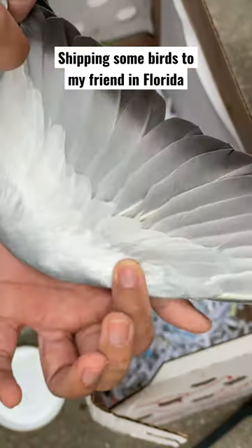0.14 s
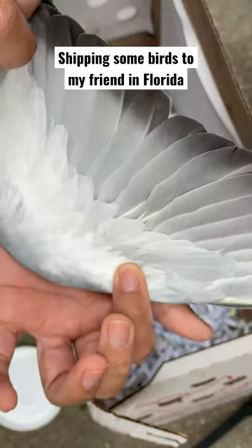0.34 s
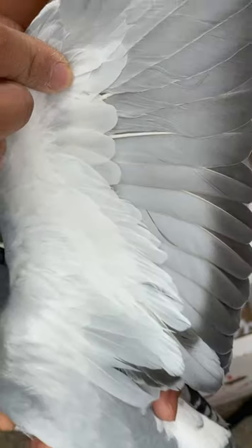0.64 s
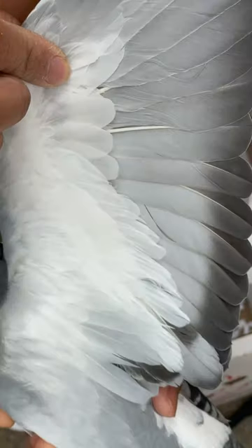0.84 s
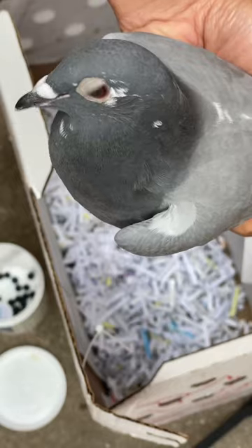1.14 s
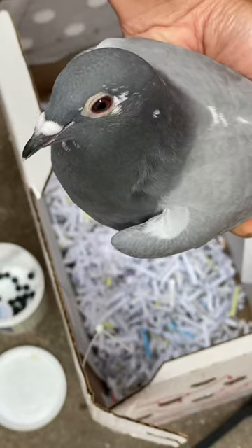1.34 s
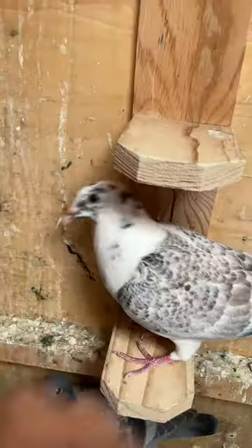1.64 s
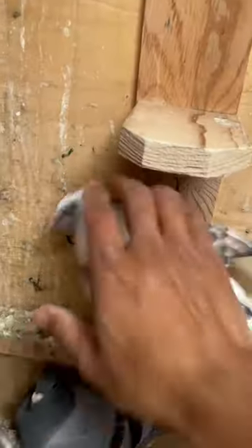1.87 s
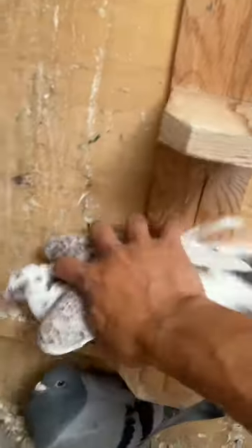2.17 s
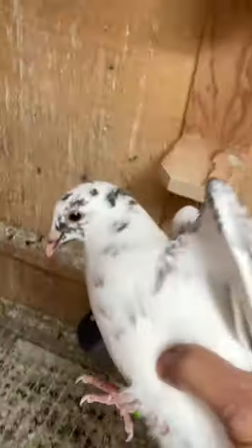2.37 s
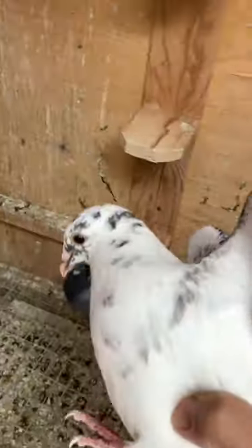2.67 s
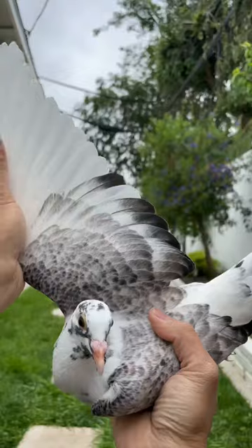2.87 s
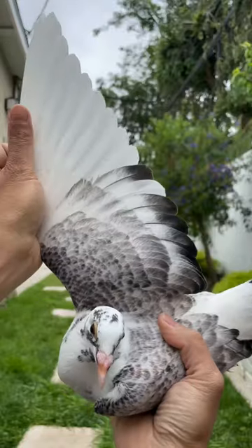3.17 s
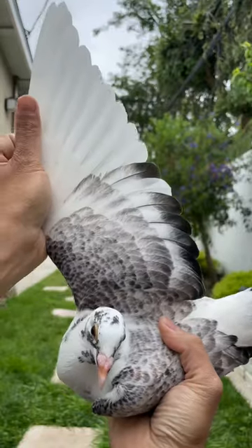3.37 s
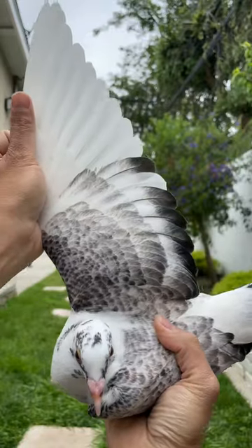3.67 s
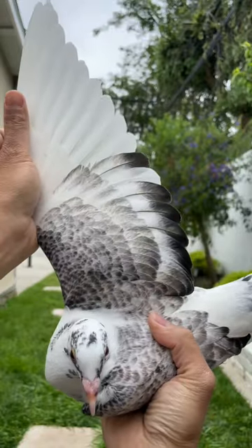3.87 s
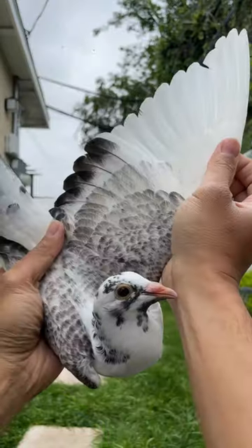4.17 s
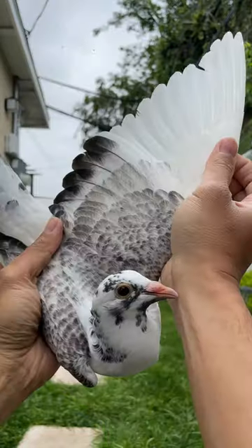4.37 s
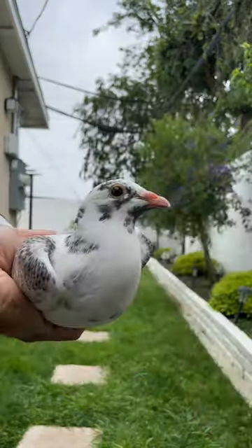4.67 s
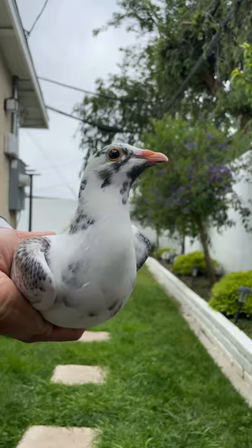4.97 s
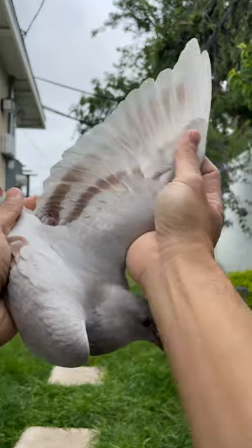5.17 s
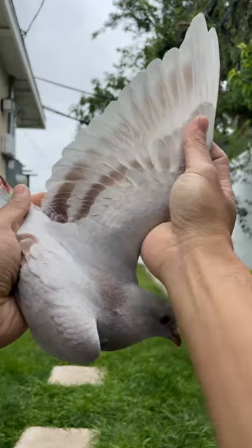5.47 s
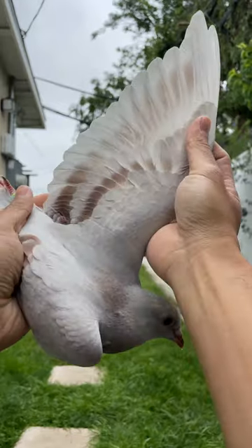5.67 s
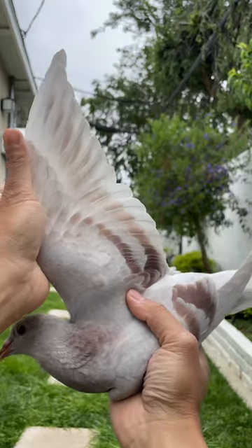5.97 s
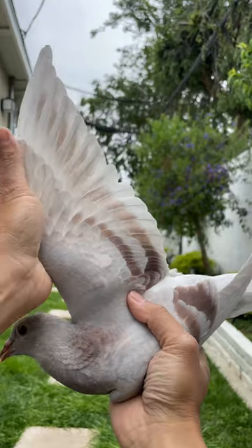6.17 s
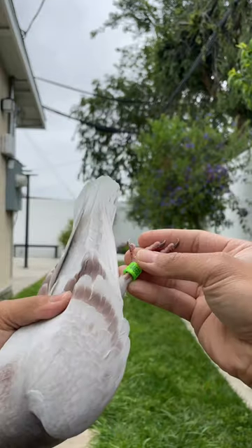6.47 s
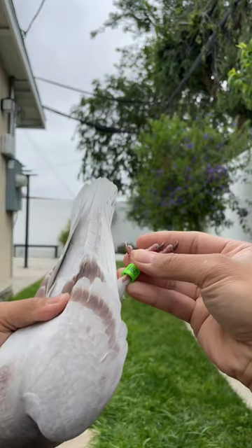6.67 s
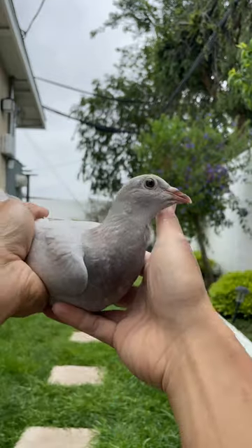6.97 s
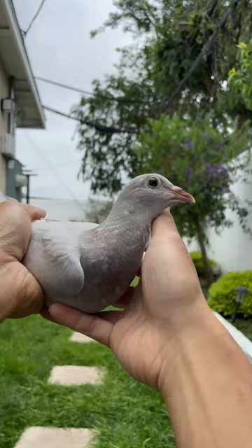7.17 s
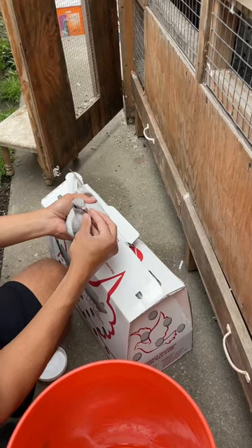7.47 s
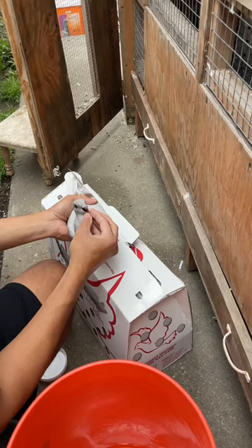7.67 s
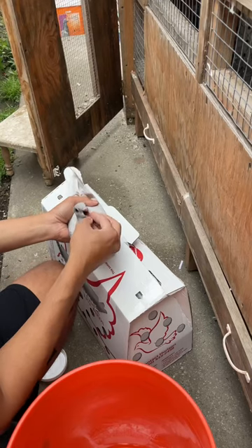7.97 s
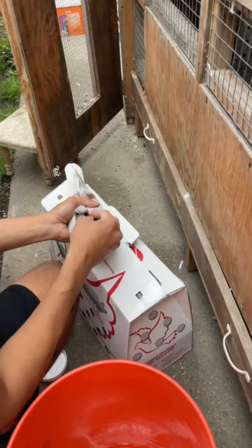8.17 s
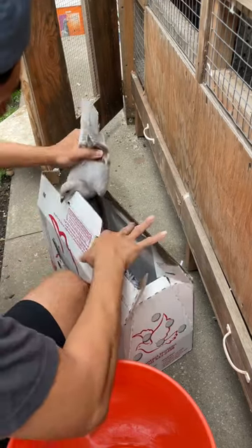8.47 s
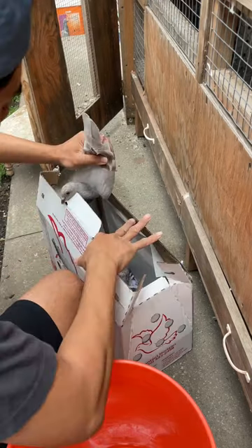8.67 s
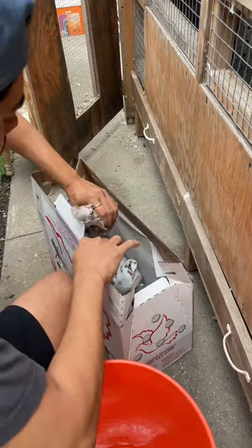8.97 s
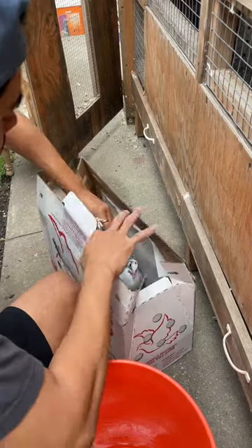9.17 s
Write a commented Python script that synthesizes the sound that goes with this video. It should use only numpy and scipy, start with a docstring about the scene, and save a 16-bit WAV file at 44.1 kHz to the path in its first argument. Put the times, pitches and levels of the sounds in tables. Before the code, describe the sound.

Pigeons are handled close up, feathers swishing and wings bursting against wood, with young birds squeaking, sparrows chirping and low distant traffic.

```python
"""Pigeons are handled, in a wooden loft and into a cardboard box: feathers swish and rustle (shaped noise that swells),
bodies bump, quills flick and fingers knock (noise and clicks ring wood and card), while birds squeak and coo.
Sparrows and far songbirds (gliding tones) call across an echoing garden, over a low traffic rumble (deep noise).
The sound is a chain of short shots, each with its own resting levels, a very quick fade in and out."""
import sys
import numpy as np
from scipy import signal
from scipy.fft import rfft, irfft, next_fast_len
from scipy.io import wavfile

SR = 44100
rng = np.random.default_rng(int(sys.argv[2]) if len(sys.argv) > 2 else 0)


def to_wav(sig):
    """Store sig (one row per channel, or 1-D mono) as 16-bit WAV at the path in sys.argv[1].

    Samples outside -1..1 are clipped; the rate is SR.
    """
    pcm = np.clip(np.atleast_2d(sig), -1, 1) * 32767
    pcm = np.round(pcm).astype(np.int16)
    wavfile.write(sys.argv[1], SR, pcm.T)  # frames by channels


N = 411894


def from_db(db):
    """Turns dB into a plain gain."""
    return 10 ** (np.asarray(db) / 20)


def rms_one(x):
    """Scales a sound to an rms level of 1."""
    return x / np.sqrt(np.mean(x ** 2) + 1e-20)


def at_hz(points, hz):
    """Reads a curve of (f/Hz, value) points, joined by lines over log frequency."""
    points_hz, values = np.array(points).T
    return np.interp(np.log(hz), np.log(points_hz), values)


def drift(rate, size):
    """Slow chance: random points, rate of them a second, joined by lines."""
    points = 1.57 * rng.standard_normal(int(size * rate / SR) + 2)
    return np.interp(np.arange(size) * rate / SR, np.arange(len(points)), points)


def two_ports(mid, side):
    """Left hears mid plus side, right hears mid minus side."""
    return mid + side * [[1], [-1]]


def panned(x, pan_db):
    """Makes the left port louder than the right by pan_db."""
    return x * from_db([[pan_db / 2], [-pan_db / 2]])


# where the shots begin, and the end of the last: [t/s]
SHOT_EDGES = [0, .542, 1.063, 1.583, 2.322, 2.565, 2.852, 4.028, 4.648, 5.14, 5.728, 6.405, 6.968, 7.33,
              8.364, 9.34]


def add(out, sound, start_s, inside_s):
    """Mixes in a sound, heard only within the shot that holds the moment inside_s."""
    shot = np.clip(np.searchsorted(SHOT_EDGES, inside_s), 1, len(SHOT_EDGES) - 1)
    at = round(start_s * SR)
    first = max(at, round(SHOT_EDGES[shot - 1] * SR))
    last = min(at + sound.shape[1], round(SHOT_EDGES[shot] * SR), N)
    out[:, first:last] += sound[:, first - at:last - at]


def by_shot(values):
    """Gives every sample the value of its shot."""
    return np.array(values)[np.searchsorted(SHOT_EDGES[1:-1], np.arange(N) / SR)]


def ring(x, hz, width):
    """A two-pole resonance, like a small body that rings at hz, with gain 1 on top."""
    r = np.exp(-np.pi * width / SR)
    poles = [1, -2 * r * np.cos(2 * np.pi * hz / SR), r * r]
    return signal.lfilter((1 - r * r) / 2 * np.array([1, 0, -1]), poles, x)


def banded_noise(mid_spectrum, side_spectrum, side_db, patchy_db, grain_db, lumpy_db):
    """Third-octave noise bands flicker one by one; fine grain and slower lumps run through them; mid rms 1."""
    mid, side = 0, 0
    low_end, high_end = mid_spectrum[0][0], mid_spectrum[-1][0]
    edges = low_end * 2 ** np.arange(0, np.log2(high_end / low_end), 1 / 3)
    texture_db = grain_db * drift(250, N) + lumpy_db * drift(22, N)
    # two pairs of noises take turns, so that neighbouring bands differ
    white = rng.standard_normal((2, 2, N)) * from_db(texture_db)
    for k, (low, high) in enumerate(zip(edges, [*edges[1:], high_end])):
        band = signal.butter(2, [low, high], "band", fs=SR, output="sos")
        mid_band, side_band = signal.sosfilt(band, white[k % 2])
        flicker_db = patchy_db * drift(14, N)
        centre = np.sqrt(low * high)
        mid = mid + mid_band * from_db(at_hz(mid_spectrum, centre) + flicker_db)
        side = side + side_band * from_db(at_hz(side_spectrum, centre) + flicker_db)
    return two_ports(rms_one(mid), from_db(side_db) * rms_one(side))


def note(rows, overtones=(), burr_db=1.5, waver_hz=8.7):
    """A near sine glides along rows of [t/s, f/Hz, level/dB]; quick flutter of pitch and level roughens it."""
    s, hz, db = np.transpose(rows)
    t = np.arange(s[0], s[-1], 1 / SR)
    pitch_flutter, level_flutter = drift(450, len(t)), drift(300, len(t))
    phase = 2 * np.pi * np.cumsum(np.interp(t, s, hz) + waver_hz * pitch_flutter) / SR
    tone = np.sin(phase) + sum(from_db(level_db) * np.sin(k * phase) for k, level_db in overtones)
    soft_ends = np.minimum(1, np.minimum(t - s[0], s[-1] - t) / 0.0021)
    burr = rms_one(from_db(burr_db * level_flutter))
    return np.sqrt(2) * tone * soft_ends * from_db(np.interp(t, s, db)) * burr


def call_rows(start, length, first_hz, held_hz, last_hz, db, shape):
    """A call glides to its held pitch and bends off at the end; its level is attack, hold, release."""
    loud, held, bend, first_db, last_db = shape
    share = np.array([0, loud, held, bend, 1])
    hz = np.interp(share, [0, held, bend, 1], [first_hz, held_hz, held_hz, last_hz])
    return np.transpose([start + length * share, hz, db + np.array([first_db, 0, 0, 0, last_db])])


def echoed(x, wet_db, t60, apart=0.56, early=1.4):
    """Ground and near walls answer first, then a diffuse tail follows, partly alike at both ports."""
    t = np.arange(int(t60 * SR)) / SR
    fading = from_db(-60 * t / t60) + early * from_db(-60 * t / 0.0747)
    tail = rng.standard_normal((2, len(t))) * fading * (t > .003)
    tail = from_db(wet_db) * two_ports(tail[0], apart * tail[1]) / np.sqrt(np.sum(tail[0] ** 2))
    tail[:, 0] = 1  # the direct sound
    return signal.fftconvolve(x[None], tail, axes=1)


# each shot at rest: [traffic level/dB, feather swish level/dB,
# scuffing on hand and card level/dB, dull rubbing on wood and box level/dB]
REST_LEVELS = [(-49, -69, -74, -69), (-48.5, -72, -67, -67), (-50.5, -74.5, -73.5, -65),
               (-42.5, -71, -83, -71.5), (-48.5, -64.5, -66.5, -74), (-46.5, -59.5, -63, -64),
               (-49.5, -100, -85.5, -69.5), (-49, -81.5, -74.5, -72.5), (-50, -93, -72.5, -74),
               (-47.5, -73, -75.5, -70), (-47.5, -70, -80.5, -73), (-48.5, -100, -81.5, -70.5),
               (-46.5, -100, -74, -67), (-48.5, -85, -76, -71), (-47.5, -70, -74, -63.5)]
# movements of bird and hand: [peak t/s, rise t/s, fall t/s, swish level/dB, scuff level/dB, rub level/dB]
MOVEMENTS = [(.225, 0.033, 0.068, -67, -59.5, -75), (9.27, .05, .08, -65, -52, -65),
             (.885, .012, .06, -62, -62, -80), (1.19, .012, 0.06, -64, -75, -80),
             (.278, 0.12, 0.1, -80, -80, -50.5), (1.05, .1, 0.036, -69, -61, -71),
             (1.33, 0.38, 0.28, -74, -65, -60), (1.402, 0.048, 0.11, -59, -65, -53.5),
             (1.739, .006, 0.26, -52, -60, -47), (1.852, .025, 0.17, -35.5, -47, -48),
             (2.012, 0.04, 0.063, -37.5, -38, -35.5), (2.04, .03, 0.68, -43, -48, -50),
             (2.31, .3, 0.077, -66, -69, -52), (2.376, 0.018, 0.14, -73, -66, -51),
             (2.58, 0.044, 0.089, -50, -48, -70), (2.752, 0.013, .08, -53, -56.5, -72),
             (2.663, 0.093, 0.12, -70, -73, -46), (2.869, 0.1, 0.85, -66.5, -73, -79),
             (4.79, 0.083, 0.13, -64, -70, -63.5), (5.458, 0.025, 0.091, -59.5, -72.5, -78.5),
             (5.58, 0.026, 0.078, -86, -61, -60.5), (5.66, 0.33, 0.039, -95, -85, -68),
             (5.752, 0.021, 0.18, -60.5, -64, -62.5), (6.1, 0.3, 0.14, -76, -69.5, -80),
             (6.57, 0.18, 0.49, -88, -95, -78), (7.15, 0.23, 0.24, -88, -81, -63.5),
             (7.36, .03, 0.17, -69, -63.5, -70), (7.45, 0.11, 0.12, -63.5, -65.5, -59.5),
             (7.854, 0.099, 0.1, -57, -53.5, -55), (7.974, 0.041, 0.056, -55, -64.5, -76),
             (8.41, 0.064, 0.4, -56.5, -55.5, -52.5), (8.49, .04, 0.13, -72, -69, -52.5),
             (8.62, 0.074, 0.28, -76, -67, -56.5), (8.83, 0.13, 0.085, -62, -60.5, -60),
             (8.945, .03, .1, -68, -68, -57), (8.724, 0.022, 0.054, -55, -53, -54),
             (9.27, 0.91, 0.11, -53, -54, -54), (9.318, 0.057, 0.057, -44, -52, -38.5)]
SWELL_SWING_DB = 20  # level change over one rise or fall time
# a broad hiss swells with each sparrow chirp and dies slowly
CALL_HISS_LAG_S, CALL_HISS_RISE_S, CALL_HISS_FALL_S = 0.021, 0.13, 0.2
LONG_CHIRP_HISS_DB = -55


def rustle_gains():
    """Gains of swish, scuff and rub: the shot at rest plus each swell, rising and falling evenly in dB."""
    power = from_db(2 * by_shot(REST_LEVELS).T[1:])
    calls = [(s, hiss_db) for s, *_, hiss_db in CHIRP_TIMES]
    calls.append((LONG_CHIRP_S + 2 * CALL_HISS_LAG_S, LONG_CHIRP_HISS_DB))
    # the hiss goes into the swish alone
    hisses = [(s + CALL_HISS_LAG_S, CALL_HISS_RISE_S, CALL_HISS_FALL_S, db, -np.inf, -np.inf)
              for s, db in calls]
    for s, rise, fall, *db in MOVEMENTS + hisses:
        t = np.arange(-2 * rise, 2 * fall, 1 / SR)
        swell_db = -SWELL_SWING_DB * np.where(t < 0, -t / rise, t / fall)
        shot_start = SHOT_EDGES[np.searchsorted(SHOT_EDGES, s + CALL_HISS_LAG_S) - 1]
        add(power, from_db(2 * (np.c_[db] + swell_db)), s - 2 * rise, max(s, shot_start + 1 / SR))
    return np.sqrt(power)


# tone colour of the swish, the part alike at both ports: [f/Hz, relative level per Hz/dB]
SWISH_COLOUR = [(530, -57.5), (900, -14.5), (991, -19), (1310, -3), (1620, -6.5), (1770, -7), (2630, -5),
                (6480, -3.5), (8050, -3), (8660, -25.5), (9880, -22), (13400, 1), (16000, 0)]
# the same for the part opposed at the ports: [f/Hz, relative level per Hz/dB]
SWISH_SIDE_COLOUR = [(530, -10.5), (900, 13.5), (1470, -15), (1920, -14.5), (2570, 6), (4680, -2.5),
                     (9770, 11.5), (12100, 3), (14900, -51), (16000, -26)]
AIR_DB = -94  # the air at rest


def feather_swish(gain):
    """Feathers brushing past make bright noise with patchy flicker, over a trace of still air."""
    noise = banded_noise(SWISH_COLOUR, SWISH_SIDE_COLOUR, side_db=-0.5, patchy_db=2.0, grain_db=2.0, lumpy_db=1.3)
    return (gain + from_db(AIR_DB)) * noise


# tone colour of scuffing: [f/Hz, relative level per Hz/dB]
SCUFF_COLOUR = [(600, -16.5), (1000, -1.5), (1600, -5), (2400, -2), (3600, -7), (6000, -18)]


def scuffing(gain):
    """Scuffing on hand and card makes grainy noise in the middle of the range."""
    return gain * banded_noise(SCUFF_COLOUR, SCUFF_COLOUR, side_db=-7, patchy_db=1.6, grain_db=2.5, lumpy_db=2.6)


# tone colour of rubbing: [f/Hz, relative level per Hz/dB]
RUB_COLOUR = [(120, -28), (250, 3.5), (500, -1.5), (900, -7), (1800, -29)]


def rubbing(gain):
    """Dull rubbing on wood and box makes low, lumpy noise."""
    return gain * banded_noise(RUB_COLOUR, RUB_COLOUR, side_db=0.0, patchy_db=1.5, grain_db=1.0, lumpy_db=2.5)


# bodies bumping wood or card: [t/s, level/dB, level of the modes under 150 Hz/dB, pan/dB (plus is left)]
BODY_BUMPS = [(0.234, -30, -35, 2.5), (1.075, -40.5, -19, 5), (1.343, -45.5, -20, 3),
              (1.746, -31.5, -6, 1.5), (1.848, -39, -1, 6), (1.876, -33.5, 3, 7.5), (1.905, -41, -5, 6),
              (2.011, -27, 13.5, 4), (2.03, -36, -1, 13.5), (2.063, -42.5, 13, -1), (2.087, -40, 11, 5),
              (2.108, -35, 15, 4.5), (2.147, -43.5, 10, 6), (2.23, -43.5, 6, 10), (2.305, -34, -5, 5),
              (2.38, -34.5, -6, 5.5), (2.634, -24.5, -17.5, 4), (8.469, -39.5, -20, -5),
              (8.935, -42, 0, -2), (9.025, -35, 2, -1.5), (9.088, -43.5, -2, -1), (9.319, -30.5, -18, -4)]
# ringing modes of the panel: [f/Hz, level/dB, time to die by 60 dB t/s]
PANEL_MODES = [(63, -4.5, 0.22), (114.4, 4, 0.098), (143.6, 1.5, 0.067), (235.6, -4.5, 0.16),
               (302, -4, 0.056), (389, -2.5, 0.063), (524, -9, 0.044), (728, -17, 0.087), (944, -23, 0.075)]


def bumps():
    """A soft body lands as a push and a short shuffle; panel modes ring, most of them unlike at the ports."""
    out, t = np.zeros((2, N)), np.arange(int(.3 * SR)) / SR
    chances = rng.standard_normal((len(BODY_BUMPS), len(PANEL_MODES)))
    for (s, db, low_db, pan_db), lifts in zip(BODY_BUMPS, chances):
        shuffle = rng.standard_normal((2, len(t))) * from_db(-24.5 - 60 * t / 0.23)
        push = two_ports(shuffle[0], 0.5 * shuffle[1])
        push[:, 0] = 1
        body = 0
        for (hz, mode_db, t60), lift in zip(PANEL_MODES, lifts):
            level_db = mode_db + 1.5 * lift + (low_db if hz < 150 else -6.0)
            mode = from_db(level_db - 60 * t / t60) * np.sin(2 * np.pi * hz * t)
            if hz > 150:
                body = body + signal.fftconvolve(push, mode[None], axes=1)[:, :len(t)]
            else:
                # the lowest modes answer the push alone and move both ports alike
                body = body + mode * (1 - np.exp(-t / 0.0066))
        add(out, panned(from_db(db) * body, pan_db), s, s + .005)
    return out


# quills and claws flicking: [t/s, level before a further 7 dB cut/dB, centre f/Hz, treble share/dB,
# time to die by 60 dB t/s, pan/dB (plus is left)]
FLICK_TIMES = [(0.5013, -48, 5400, 4, 0.052, 0.0), (0.6, -55.5, 1180, 12.5, 0.061, 3),
               (1.293, -47.5, 1150, -20, .1, 4), (1.847, -40, 2960, 16, 0.078, 9),
               (1.9457, -37, 1140, 24, 0.02, 4), (1.963, -48, 2000, 20, .06, 4),
               (1.9882, -32, 1570, 14.5, 0.14, 5), (2.0095, -25, 900, 9, 0.067, 15),
               (2.5756, -33.5, 2300, 3, 0.087, 5), (5.3352, -49, 2740, 10.5, 0.056, -6),
               (5.463, -40, 3250, 10, 0.03, -1.5), (7.025, -57, 1110, -20, 0.084, -1.0),
               (7.38, -49, 1650, -32, 0.16, 1), (7.418, -53, 2300, -28, 0.099, 0),
               (7.452, -48, 2000, -29, 0.15, 0.5), (7.4934, -53, 2050, -10, 0.039, 0.0),
               (7.642, -60, 2900, -16, 0.17, 1.5), (7.786, -48, 2710, -26, 0.073, -0.5),
               (7.828, -34, 2000, -6, 0.089, 3.5), (7.8428, -35, 1730, -17, 0.16, 1),
               (7.9668, -44, 1170, -33, 0.092, -2), (8.05, -57, 3190, -25, 0.25, -2.0),
               (8.197, -52.5, 2980, -34, 0.22, -1), (8.287, -56.5, 930, -29, 0.14, -4),
               (8.7182, -34, 2120, -15, 0.087, 0.0), (9.02, -32.5, 1480, -39, 0.096, -1.5),
               (9.136, -29.5, 2020, -18, 0.043, -0.5), (9.2376, -40, 2270, -25, 0.12, -1.5),
               (9.2592, -34, 2250, -24, 0.11, -1), (9.2893, -28, 2300, -24, 0.056, -1.5),
               (9.313, -36, 1300, -15, 0.054, -4)]
# quill and card resonances: [f/Hz, width f/Hz, level/dB]
CARD_RINGS = [(1124, 140, -3.5), (1920, 1200, -4), (2760, 1450, -4.5), (3730, 3800, -5)]


def flicks():
    """A grainy puff rings quill and card, strongest near its centre, with a treble swish that dies faster."""
    out, t = np.zeros((2, N)), np.arange(int(.15 * SR)) / SR
    treble = signal.butter(2, 5500, "high", fs=SR, output="sos")
    for s, db, hz, treble_db, t60, pan_db in FLICK_TIMES:
        noise = rng.standard_normal((2, len(t))) * from_db(0.79 * drift(550, len(t)))
        noise = two_ports(noise[0], 0.12 * noise[1])
        card = 0
        for top, width, top_db in CARD_RINGS:
            level_db = top_db - 1.9 * abs(np.log2(top / hz))  # weaker by 1.9 dB an octave away
            card = card + from_db(level_db) * ring(ring(noise, top, width), top, 2 * width)
        puff = rms_one(card + 2.1 * ring(noise, hz, 390) + 0.039 * noise)
        swish = rms_one(signal.sosfilt(treble, noise)) * from_db(treble_db - 30 * t / t60)
        envelope = from_db(db - 7.0 - 60 * t / t60) * np.minimum(1, t / .002)
        add(out, panned(envelope * (puff + swish), pan_db), s, s + .005)
    return out


# fingers knocking the closed box: [t/s, level/dB, strongest near f/Hz, crackle decay t/s]
BOX_KNOCKS = [(7.8165, -46, 1000, .008), (7.828, -39, 3900, .006), (7.832, -35, 1100, .006),
              (7.845, -36.5, 1800, 0.01), (7.859, -43, 1900, 0.0088), (7.877, -48, 1900, .01),
              (7.905, -53.5, 1900, .015), (7.9674, -50, 1200, 0.011)]
# ringing modes of the box: [f/Hz, level/dB, time to die by 60 dB t/s]
BOX_MODES = [(840, -6, .03), (1100, 0, .045), (1560, -2, .03), (1890, 0, .06), (2670, -3, .025),
             (3865, -2, .025), (4221, -4, .025), (5685, -12, .015)]


def knocks():
    """Each knock is a short crackle of uneven clicks that rings the box, most the modes near its own pitch."""
    out, t = np.zeros((2, N)), np.arange(int(.12 * SR)) / SR
    for s, db, near_hz, crackle_s in BOX_KNOCKS:
        is_click = rng.random(len(t)) < 2500 / SR  # about 2500 clicks a second
        clicks = is_click * rng.standard_normal(len(t)) * np.exp(-t / crackle_s)
        clicks[0] = 1
        body = 0
        for hz, mode_db, t60 in BOX_MODES:
            level_db = mode_db - 7.6 * abs(np.log2(hz / near_hz)) - 60 * t / t60
            phase = rng.uniform(0, 1, (2, 1))  # a different start at each port
            body = body + from_db(level_db) * np.sin(2 * np.pi * hz * t + phase)
        clicks = clicks[None] / np.linalg.norm(clicks)
        add(out, from_db(db) * signal.fftconvolve(clicks, body, axes=1), s, s)
    return out


# young pigeons: [start t/s, length t/s, first f/Hz, held f/Hz, last f/Hz, level/dB]
YOUNG_SQUEAKS = [(0.325, 0.082, 4130, 4190, 3700, -62.5), (2.591, 0.14, 3710, 4033, 3620, -38.5),
                 (8.369, 0.11, 4010, 4057, 3810, -48), (8.5, 0.094, 3700, 3640, 3600, -65),
                 (8.63, 0.077, 3950, 3820, 3480, -55.5), (9.038, .045, 3580, 3620, 3700, -64),
                 (9.078, 0.046, 3840, 3776, 3700, -55), (9.239, 0.076, 3880, 4160, 3900, -44),
                 (9.322, 0.028, 3570, 3720, 3700, -50)]
# overtones of a near squeak: [multiple of the pitch, level/dB]
SQUEAK_HARMONICS = [(2, -21), (3, -21.5)]
# [loud from, pitch held from, bend from (shares of the length), first level/dB, last level/dB]
SQUEAK_OUTLINE = (.12, .45, .82, -10, -14)


def squeaks():
    """Young pigeons squeak: short, nearly pure gliding tones with a brief close echo."""
    out = np.zeros((2, N))
    for rows in [call_rows(*row, SQUEAK_OUTLINE) for row in YOUNG_SQUEAKS]:
        # in the loft the young sit close on the left, near enough for their overtones to carry
        in_loft = SHOT_EDGES[3] < rows[0][0] < SHOT_EDGES[6]
        pan_db = 8.0 if in_loft else -2.2
        tone = note(rows, SQUEAK_HARMONICS if in_loft else (), 1.6, 28.4)
        add(out, panned(echoed(tone, -7.5, 0.074, 0.48), pan_db), rows[0][0], rows[0][0] + .01)
    return out


# a pigeon's rolled coo over the open box, one throb a row: [t/s, rms level/dB, power share of pulses against breath]
COO_THROBS = [(1.222, -63, .05), (1.282, -62, .05), (1.34, -57.5, .45), (1.4, -55.5, .3), (1.463, -58, .35),
              (1.523, -58, .45)]
# rings that colour the throbs: [f/Hz, width f/Hz, level/dB]
COO_RESONANCES = [(640, 270, 2.5), (1080, 350, -1.5), (1400, 140, 2), (2800, 230, 4), (3300, 360, 5),
                  (4480, 660, 1), (6140, 280, -7)]
# low tone of the coo, whose pitch the pulses follow too: [t/s, f/Hz, level/dB]
COO_TONE = [(1.335, 350, -61), (1.4, 357.7, -63), (1.45, 325.4, -67), (1.49, 285.5, -61),
            (1.525, 253.8, -55), (1.585, 250.6, -53.5)]
THROB_RISE_S, THROB_FALL_S = 0.012, .034
# each throb finds the rings a little moved (share of pitch) and changed in strength
THROB_SHIFT, THROB_SPREAD_DB = .02, 2


def coo_throbs():
    """Throat pulses, mostly on a sinking pitch, mix with breath in quick throbs through a set of rings."""
    out, size = np.zeros((2, N)), int(.09 * SR)
    t = np.arange(size) / SR
    throb = (1 - np.exp(-t / THROB_RISE_S)) * np.exp(-t / THROB_FALL_S)
    chances = rng.standard_normal((len(COO_THROBS), len(COO_RESONANCES), 2))
    for (s, db, voiced), chance in zip(COO_THROBS, chances):
        pitch = np.interp(s + t, *np.transpose(COO_TONE)[:2]) + 7.0 * drift(200, size)
        # one pulse each time a cycle is completed
        pulses = rms_one(np.diff(np.floor(np.cumsum(pitch) / SR), prepend=0))
        breath = rng.standard_normal((2, size))
        throat = np.sqrt(voiced) * pulses + np.sqrt(1 - voiced) * breath[0]
        source = two_ports(throat, 0.28 * breath[1]) * throb
        rings = 0
        for (hz, width, top_db), (shift, spread) in zip(COO_RESONANCES, chance):
            moved_hz = hz * (1 + THROB_SHIFT * shift)
            rung = rms_one(ring(ring(source, moved_hz, width), moved_hz, 2 * width))
            rings = rings + from_db(top_db + THROB_SPREAD_DB * spread) * rung
        add(out, from_db(db) * rms_one(rings), s, s)
    return out


# a hum in the loft: [t/s, f/Hz, level/dB]
LOFT_HUM = [(1.585, 115.7, -56.5), (1.9, 115.3, -41.5), (2.2, 113.8, -43.5), (2.32, 112.6, -55)]


def coo_tone_and_hum():
    """The coo's low tone and the loft hum are gliding tones with their octave and a short close echo."""
    out = np.zeros((2, N))
    for rows in COO_TONE, LOFT_HUM:
        tone = note(rows, [(2, -7.5)], 0.99, 19.7)
        add(out, echoed(tone, -2.5, 0.13), rows[0][0], rows[0][0] + .01)
    return out


# a rough call falling away close by: [t/s, f/Hz, level/dB]
FALLING_CALL = [(.675, 5300, -67), (.688, 4000, -57), (.71, 3500, -60), (.74, 3130, -58), (.765, 2600, -58),
                (.79, 2200, -57), (.81, 2150, -60), (.83, 1850, -76)]
# its low ending, an octave down: [t/s, f/Hz, level/dB]
FALLING_LOW = [(.762, 1100, -74), (.785, 1074, -64), (0.799, 1060, -54), (.815, 1046, -65), (.84, 990, -81)]
# a thin upper branch over the ending: [t/s, f/Hz, level/dB]
FALLING_HIGH = [(.765, 4600, -76), (.79, 4100, -71), (.815, 3750, -71), (.835, 3650, -75)]


def falling_call():
    """A rough call falls away close by: a fluttering tone, joined near its end by a low and a high branch."""
    out = np.zeros((2, N))
    rasp = note(FALLING_CALL, [(1.8, -20)], burr_db=3.5, waver_hz=95.0)
    add(out, echoed(rasp, -1.0, 0.15, 0.3, 0.6), FALLING_CALL[0][0], FALLING_CALL[0][0])
    for rows in FALLING_LOW, FALLING_HIGH:
        add(out, echoed(note(rows, (), 3.2, 74.0), 0.5, 0.092, .3), rows[0][0], rows[0][0])
    return out


# house walls across the garden answer the chirps: [delay t/s, level/dB]
HOUSE_ECHOES = [(.057, -13.5), (.102, -20.5), (.14, -21)]


def off_walls(x):
    """The call plus its separate echoes from far walls."""
    out = np.concatenate([x, np.zeros(SR // 5)])
    for delay_s, db in HOUSE_ECHOES:
        lag = round(delay_s * SR)
        out[lag:lag + len(x)] += from_db(db) * x
    return out


# a sparrow's chirp, a thin lead-in and two parts: [t after its start/s, f/Hz, relative level/dB]
CHIRP_PARTS = [
    [(-.028, 5680, -30), (-.016, 5500, -21.5), (-.004, 5100, -13)],
    [(0, 3327, -15), (.012, 4550, -5.5), (.024, 4750, -6), (.035, 4606, -1.5), (.043, 3747, 3),
     (.051, 3675, 0.5), (.055, 3500, -5)],
    [(.057, 2986, -11), (.064, 3250, -6.5), (.072, 3350, -0.5), (.08, 3860, 0.5), (.092, 3400, -3),
     (.1, 2894, -4.5), (.112, 2500, -23.5), (.122, 2320, -25)],
]
# its chirps: [t/s, level/dB, lead-in level/dB, first part against the second/dB, echo level/dB, hiss level/dB]
CHIRP_TIMES = [(2.985, -38.5, 0, -1, -3.5, -62), (3.612, -39.5, 1, 1.5, -3.5, -60.5),
               (3.989, -36.5, -8, -7, -2.5, -57), (6.031, -57, -14, -4, 0.5, -76),
               (6.862, -52.5, -15, -5, -1, -92)]
GARDEN_T60_S, GARDEN_DB = 0.5, 0.5  # the garden's tail: time to die by 60 dB, and level


def sparrow_chirps():
    """A sparrow chirps, three times near and twice farther off: fast sweeps with overtones and wall echoes."""
    out = np.zeros((2, N))
    for s, db, lead_db, first_db, echo_db, _ in CHIRP_TIMES:
        for rows, part_db, waver_hz in zip(CHIRP_PARTS, (lead_db, first_db, 0), (300.0, 110.0, 80.0)):
            tone = note(rows, [(2, -28.0), (3, -36.5)], 3.0, waver_hz)
            tone = from_db(db + part_db) * off_walls(tone)
            add(out, echoed(tone, echo_db, GARDEN_T60_S, 0.8, 1.3), s + rows[0][0], s + .06)
    return out


# a longer sparrow call, lead-in and two parts: [t after its start/s, f/Hz, relative level/dB]
LONG_CHIRP_PARTS = [
    [(-.03, 5600, -23), (-.018, 5630, -16), (-.006, 5910, -21), (0, 4660, -3)],
    [(0, 3060, -5.5), (.009, 4710, -12), (.022, 4100, -5.5), (.042, 3800, -1), (.052, 3105, -4.5),
     (.072, 2950, -4)],
    [(.074, 2723, -10), (.087, 3100, -2), (.099, 3570, -3), (.11, 2830, 0), (.12, 2920, -9)],
]
LONG_CHIRP_S, LONG_CHIRP_DB = 4.528, -39
# far songbirds: [start t/s, length t/s, first f/Hz, held f/Hz, last f/Hz, level/dB]
FAR_WHISTLES = [(0, 0.09, 2450, 2517, 2454, -67.5), (0, .04, 4860, 4590, 4280, -65),
                (0.258, 0.17, 2446, 2460, 2325, -69), (1.073, 0.096, 3370, 3180, 3050, -72.5),
                (1.354, 0.12, 7170, 6220, 5980, -65), (2.904, 0.057, 2630, 2840, 2740, -65),
                (3.185, 0.051, 2825, 2745, 2710, -66), (3.597, 0.045, 2780, 2850, 2760, -64),
                (3.852, 0.057, 2620, 2785, 2790, -64.5), (4.313, 0.089, 2280, 2060, 2100, -73),
                (4.413, 0.042, 2720, 2410, 2390, -65), (4.035, 0.031, 2180, 1970, 1940, -68.5),
                (4.867, 0.078, 3350, 3310, 3280, -68), (5.032, .1, 3530, 3547, 3400, -65),
                (4.767, 0.02, 1740, 1880, 1790, -70), (5.326, 0.06, 2780, 2506, 2400, -63),
                (5.398, 0.053, 2980, 2860, 2740, -68.5), (5.509, .11, 2104, 2400, 2354, -67),
                (6.802, 0.098, 3110, 2295, 2080, -64.5), (9.312, .01, 5300, 5000, 4600, -51),
                (1.077, .07, 6700, 6500, 6450, -77), (8.372, 0.03, 3640, 3120, 3320, -56.5)]
# [loud from, pitch held from, bend from (shares of the length), first level/dB, last level/dB]
WHISTLE_OUTLINE = (0.62, 0.23, 0.5, -0.5, -4.5)


def long_chirp_and_whistles():
    """A longer sparrow call and far songbirds' whistles are gliding tones with the garden's tail."""
    out = np.zeros((2, N))
    long_chirp = [np.add(rows, [LONG_CHIRP_S, 0, LONG_CHIRP_DB]) for rows in LONG_CHIRP_PARTS]
    whistles = [call_rows(*row, WHISTLE_OUTLINE) for row in FAR_WHISTLES]
    for rows in long_chirp + whistles:
        tone = note(rows, [(1.8, -22.5)], 2.0, 25.0)
        add(out, echoed(tone, GARDEN_DB, GARDEN_T60_S, 0.36, 0.6), rows[0][0], rows[-1][0] - .002)
    return out


# a far warble, a falling and a rising note: [t after its start/s, f/Hz, relative level/dB]
WARBLE_NOTES = [
    [(0, 3560, 3.5), (.012, 3385, -13), (.022, 3060, 7)],
    [(.016, 2290, -8), (.026, 2750, 1), (.034, 3040, 1.5)],
]
# when it sounds: [t/s, level/dB]
WARBLE_TIMES = [(4.662, -60), (4.705, -61), (4.82, -62), (4.862, -60), (4.9, -62), (5.017, -61.5),
                (5.058, -58), (5.098, -62)]
# a farther sparrow's reply: [t after its start/s, f/Hz, relative level/dB]
REPLY_NOTES = [
    [(0, 5450, -6), (.02, 5350, -3), (.04, 5200, -8)],
    [(.055, 3850, -5), (.075, 3650, 0), (.1, 3450, 0), (.13, 3400, -4)],
]
# when it sounds: [t/s, level/dB]
REPLY_TIMES = [(5.155, -88), (6.219, -86), (6.554, -88), (7.12, -87.5)]
# a hoarse far call sinking through the garden: [t after its start/s, f/Hz, relative level/dB]
SINKING_NOTES = [
    [(0, 2930, -2), (.03, 2730, 4), (.06, 2350, -3), (.09, 2130, 2)],
]
# when it sounds: [t/s, level/dB]
SINKING_TIMES = [(5.99, -76.5)]
FAR_T60_S = .7  # the farther sparrow leaves a longer tail


def far_calls():
    """Warbles, replies and a hoarse call are fluttering tones; the last two are mostly echo."""
    out = np.zeros((2, N))
    # notes, times, echo level/dB, pitch waver f/Hz, echo time t/s
    voices = [(WARBLE_NOTES, WARBLE_TIMES, 1.5, 50.0, GARDEN_T60_S),
              (REPLY_NOTES, REPLY_TIMES, 20.0, 200.0, FAR_T60_S),
              (SINKING_NOTES, SINKING_TIMES, 12.0, 150.0, GARDEN_T60_S)]
    for notes, calls, echo_db, waver_hz, t60 in voices:
        for s, db in calls:
            for rows in notes:
                tone = from_db(db) * note(rows, (), 2.4, waver_hz)
                add(out, echoed(tone, echo_db, t60, 0.54), s + rows[0][0], s)
    return out


# tone colour of distant traffic: [f/Hz, relative level per Hz/dB]
TRAFFIC_COLOUR = [(12, -22), (20, -19), (40, -1), (65, 0.5), (97, -5.5), (177, -13), (447, -39.5),
                  (484, -32.5), (549, -53), (900, -40.5), (1170, -63.5), (1980, -120)]


def distant_traffic():
    """Distant traffic is a deep, steady noise, nearly alike at both ports, at a level set for each shot."""
    noise = banded_noise(TRAFFIC_COLOUR, TRAFFIC_COLOUR, side_db=-20.5, patchy_db=1.0, grain_db=0.3, lumpy_db=0.4)
    return from_db(by_shot(REST_LEVELS).T[0]) * noise


FADE_IN_S, FADE_IN_DB, FADE_OUT_S = 0.015, -6.5, .003  # each shot starts a little low and ends in silence


def shot_fades():
    """The level climbs quickly at the start of each shot and drops to nothing at its end."""
    t = np.arange(N) / SR
    since_start_s = t - by_shot(SHOT_EDGES[:-1])
    until_end_s = by_shot(SHOT_EDGES[1:]) + 1 / SR - t
    fade_in = from_db(FADE_IN_DB * np.maximum(0, 1 - since_start_s / FADE_IN_S))
    return fade_in * np.minimum(1, until_end_s / FADE_OUT_S)


def scene():
    """Adds up all sources, from the handled pigeons to the traffic, and fades each shot."""
    swish_gain, scuff_gain, rub_gain = rustle_gains()
    handling = feather_swish(swish_gain) + scuffing(scuff_gain) + rubbing(rub_gain)
    hits = bumps() + flicks() + knocks()
    near_voices = squeaks() + coo_throbs() + coo_tone_and_hum() + falling_call()
    garden_birds = sparrow_chirps() + long_chirp_and_whistles() + far_calls()
    return shot_fades() * (handling + hits + near_voices + garden_birds + distant_traffic())


# how far the left port leads the right: [f/Hz, phase/radians]
LEFT_LEAD = [(60, 0), (400, 0.2), (1000, 0.0055), (3000, 0.68), (6000, 0.46), (13000, 0)]


def record(dry):
    """Sound common to both ports dips near 9 kHz, the left port leads a little, deepest bass and top are cut."""
    dry = signal.sosfilt(signal.butter(2, 36, "high", fs=SR, output="sos"), dry)
    dry = signal.sosfilt(signal.butter(4, 15000, fs=SR, output="sos"), dry)
    mid = dry.mean(0)
    dipped_mid = signal.lfilter(*signal.iirnotch(9100, 4.0, SR), mid)
    size = next_fast_len(N + 512)
    lead = at_hz(LEFT_LEAD, np.maximum(np.fft.rfftfreq(size, 1 / SR), 1))
    # half the lead moves the left port forward, half moves the right port back
    turn = np.exp(.5j * lead * [[1], [-1]])
    ports = irfft(rfft(dry - mid + dipped_mid, size) * turn, size)[:, :N]
    # steep cut: 70 dB down from 16360 Hz up
    return signal.sosfilt(signal.cheby2(12, 70, 16360, fs=SR, output="sos"), ports)


dry = scene()
out = record(dry)
to_wav(out)
```